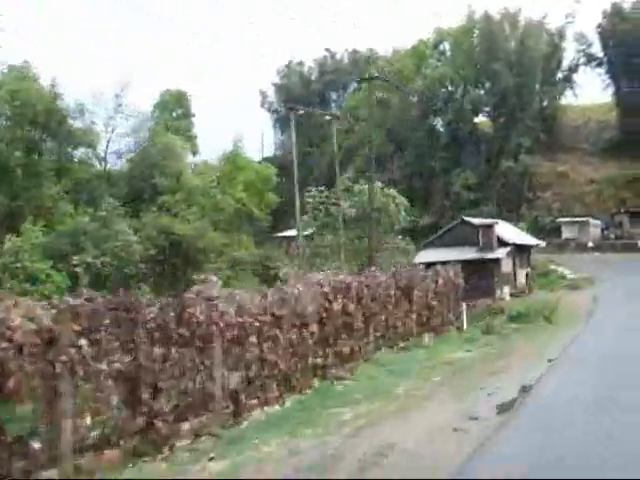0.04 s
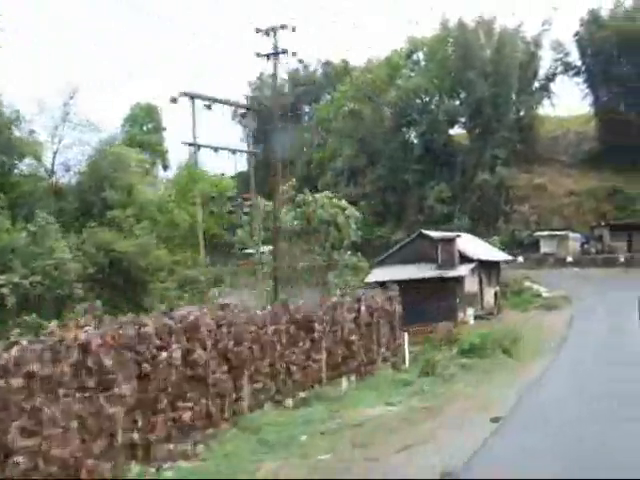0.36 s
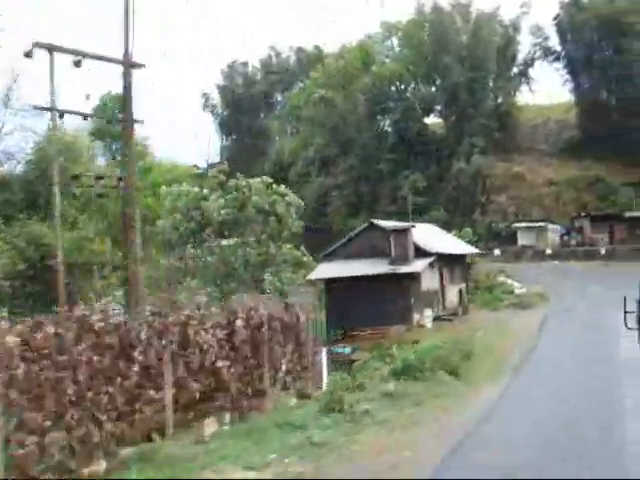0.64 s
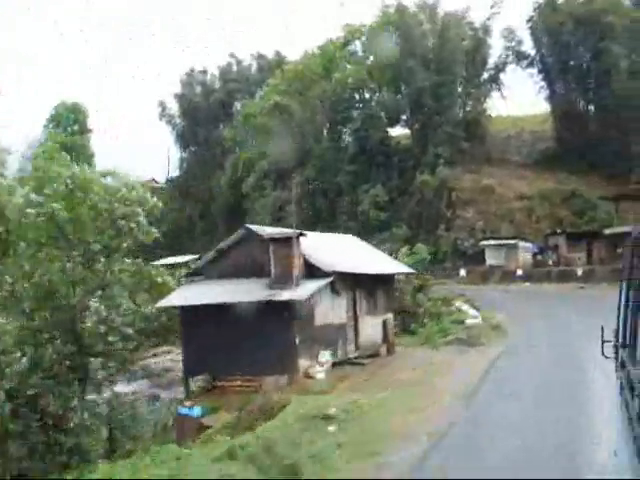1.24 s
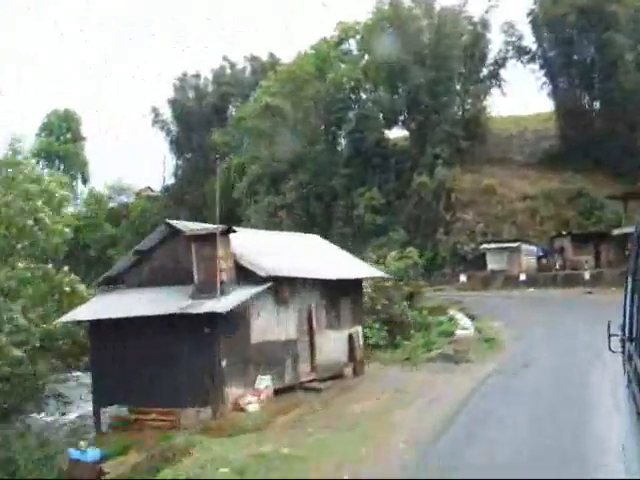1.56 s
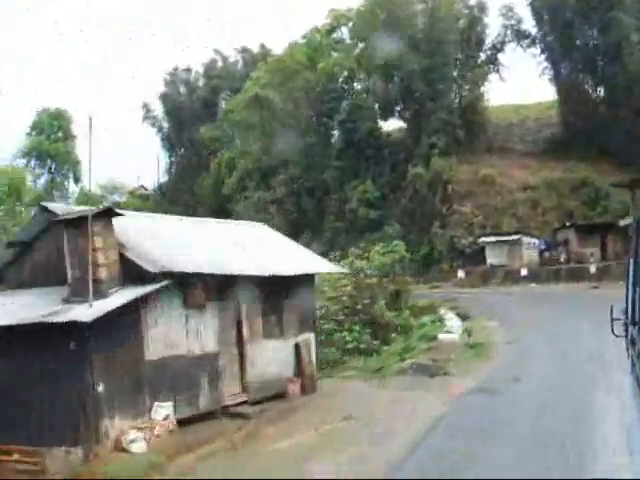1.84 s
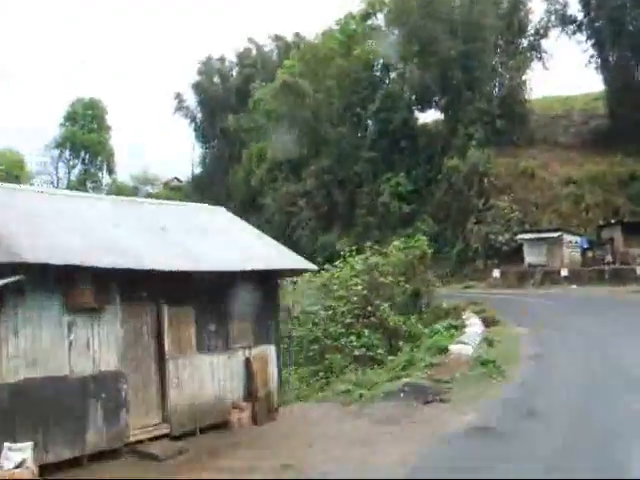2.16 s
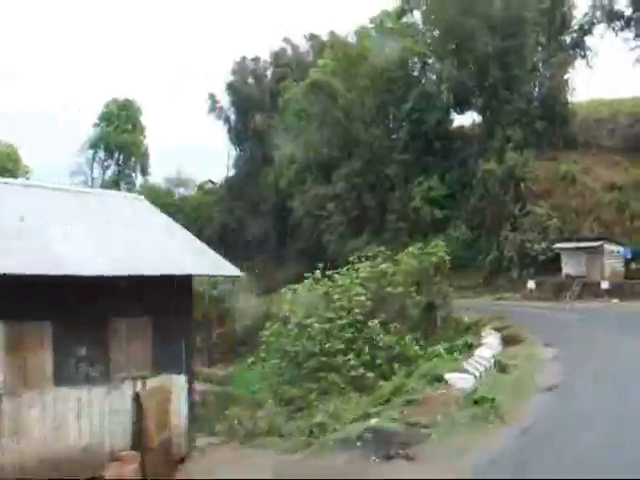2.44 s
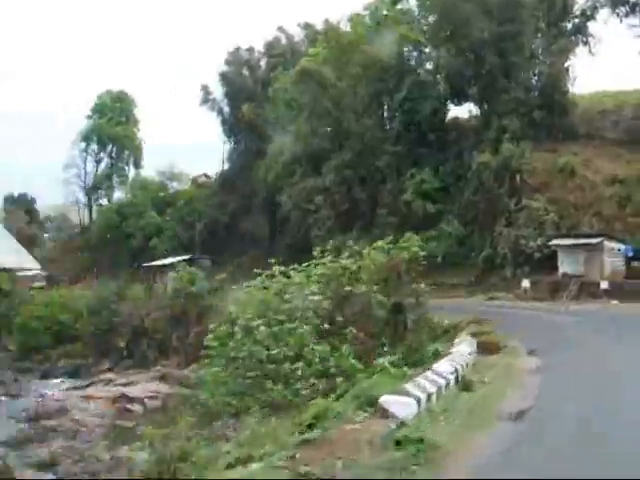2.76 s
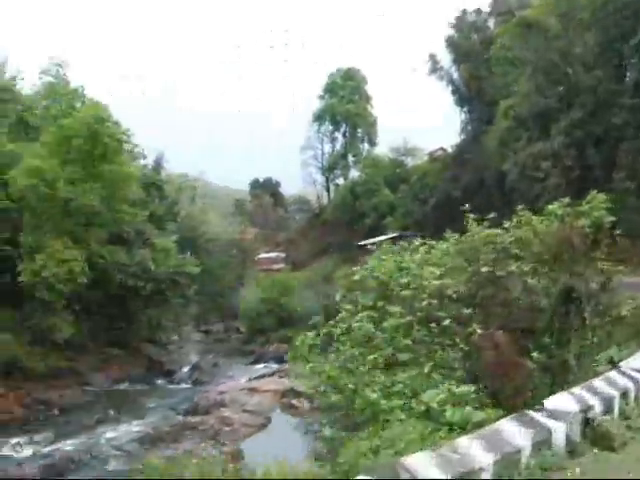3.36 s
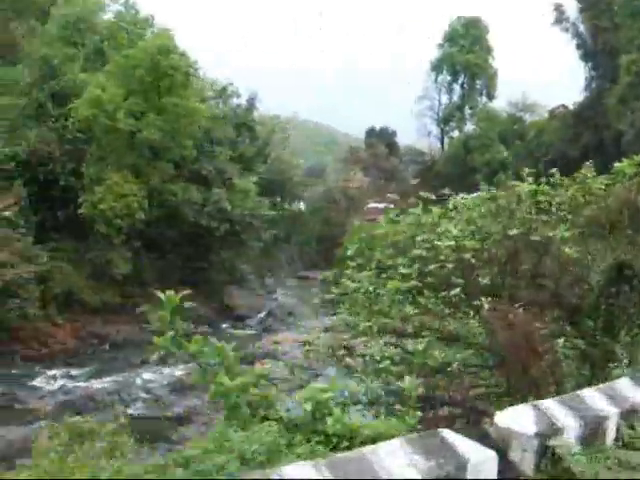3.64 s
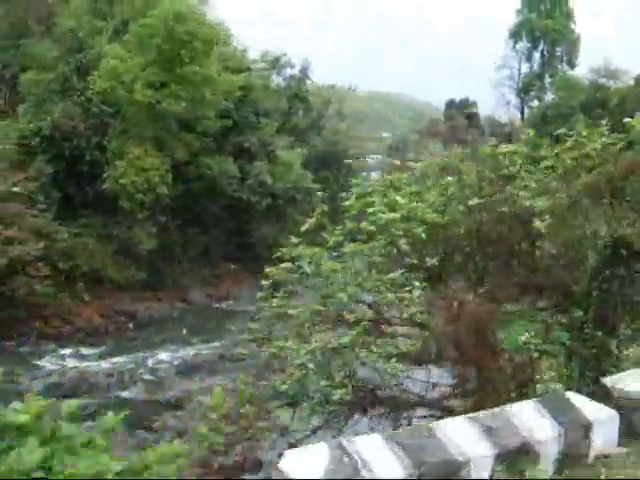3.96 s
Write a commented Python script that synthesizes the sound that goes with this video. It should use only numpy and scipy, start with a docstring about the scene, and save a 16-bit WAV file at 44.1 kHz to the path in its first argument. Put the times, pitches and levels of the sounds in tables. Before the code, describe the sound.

Wind buffets the microphone at the open window of a moving bus, in ragged gusts and low thuds over steady road rumble. The brakes gradually add a thin, high squeal with brief squeaks, then ease off near the end.

```python
"""Downhill bus at an open window

A bus rolls downhill into a bend. Its turbulent slipstream buffets the microphone and tears past
in ragged gusts, over the rumble of road and body and a faint, high hiss. Before the bend, friction
makes the brakes rub, sing thinly and squeak; a loose fitting ticks once."""
import sys
import numpy as np
from scipy import signal
from scipy.io import wavfile

SR = 44100
rng = np.random.default_rng(int(sys.argv[2]) if len(sys.argv) > 2 else 0)


def unload_audio(sound):
    """Save the sound as a 16-bit wav file, at the path given as the first command line argument."""
    columns = np.transpose(np.atleast_2d(sound))
    # keep every value between -1 and 1, then stretch to whole-number steps
    steps = np.round(np.clip(columns, -1, 1) * 32767)
    wavfile.write(sys.argv[1], SR, steps.astype(np.int16))


N = 176400
TIME = np.arange(N) / SR


def from_db(db):
    """Amplitude grows tenfold for every 20 dB."""
    return 10 ** (np.asarray(db) / 20)


def unit_rms(x):
    """Normalisation to a mean power of one."""
    return x / np.sqrt(np.mean(x ** 2) + 1e-20)


def contour(rows):
    """Linear interpolation between (seconds, value) rows."""
    return np.interp(TIME, *np.transpose(rows))


def drift(rate_hz):
    """Low-pass filtered noise wanders smoothly; rms 1."""
    pole = np.exp(-2 * np.pi * rate_hz / SR)
    return unit_rms(signal.lfilter([1], [1, -2 * pole, pole * pole], rng.standard_normal(N + SR))[SR:])


def resonant_band(x, hz, width_hz):
    """Two like resonators in series pass a band about their natural frequency; rms 1."""
    radius = np.exp(-np.pi * width_hz / SR)
    resonator = [1, 0, -1], [1, -2 * radius * np.cos(2 * np.pi * hz / SR), radius * radius]
    return unit_rms(signal.lfilter(*resonator, signal.lfilter(*resonator, x)))


def coloured_noise(spectrum):
    """Weighted half-octave bands of white noise add up to a given spectrum; rms 1."""
    hz, db = np.transpose(spectrum)
    edges = 8 * 2 ** np.arange(0, 11.5, .5)
    centres = np.sqrt(edges[1:] * edges[:-1])
    white = rng.standard_normal((2, N + SR))
    roll_off = np.minimum(1, hz[-1] / centres) ** 2 * np.minimum(1, centres / hz[0]) ** 2
    gains = from_db(np.interp(np.log(centres), np.log(hz), db)) * roll_off
    total = np.zeros(N)
    for k, gain in enumerate(gains):
        band = signal.butter(2, edges[k:k + 2], "band", fs=SR, output="sos")
        total += gain * signal.sosfilt(band, white[k % 2])[SR:]
    return unit_rms(total)


# Slow pressure swings on the microphone. Each row: time in seconds, relative level in dB.
BUFFET_LEVELS = [(0.0, -14.5), (0.24, -10.0), (0.92, -12), (1.04, -15.0), (1.36, -12), (1.8, -15.5),
                 (1.92, -12), (2.12, -15.5), (2.32, -14.5), (2.52, -18), (3.16, -14), (3.36, -12.5),
                 (3.72, -15.5), (3.98, -15.0)]
# Their spectrum. Each row: frequency in Hz, relative spectral density in dB.
BUFFET_SPECTRUM = [(8, -7.5), (14, -1), (30, 0.5), (45, -4), (70, -5), (100, -15), (160, -26.5), (300, -37),
                   (800, -72)]
# Large eddies. Each row: peak time in seconds, swell in dB.
THUD_SWELLS = [(.14, 4.5), (.28, 2), (.37, 4.5), (.49, 3.5), (.70, 7), (.89, 6), (1.15, 4.5), (1.55, 8.5),
               (1.94, 9), (2.15, 10.5), (2.37, 6.5), (2.73, 5), (3.33, 3.5), (3.62, 12.5), (3.79, 11.5)]

def buffet(gain_db=-3, thud_half_width_s=0.018):
    """Turbulent pressure: eddies push on the microphone, and the largest swell into thuds."""
    swell_db = sum(db * np.exp(-((TIME - s) / thud_half_width_s) ** 2) for s, db in THUD_SWELLS)
    return from_db(gain_db + contour(BUFFET_LEVELS) + swell_db) * coloured_noise(BUFFET_SPECTRUM)


# Airflow past the window. Each row: time in seconds, relative level in dB.
GUST_LEVELS = [(0.0, -31), (0.01, -35.5), (0.07, -33.5), (0.11, -38), (0.13, -29.5), (0.18, -44.5),
               (0.24, -32), (0.3, -44), (0.43, -44), (0.68, -33.5), (0.79, -40), (0.8, -51), (0.82, -30),
               (0.89, -37.5), (0.9, -53), (0.93, -38), (1.04, -35), (1.39, -34.5), (1.43, -47.5),
               (1.5, -30), (1.55, -37.5), (1.6, -34.5), (1.64, -38), (1.66, -32.5), (1.7, -42),
               (1.77, -33.5), (1.93, -40.5), (1.94, -27), (1.96, -49), (2.03, -36.5), (2.07, -42.5),
               (2.15, -35), (2.17, -48.5), (2.27, -38), (2.28, -33), (2.34, -37), (2.36, -28.5),
               (2.38, -43.5), (2.49, -33.5), (3.03, -37.5), (3.07, -41.5), (3.1, -31), (3.15, -39.5),
               (3.16, -32), (3.24, -44.5), (3.29, -26.5), (3.34, -43), (3.39, -37.5), (3.4, -47.5),
               (3.44, -36.5), (3.45, -49), (3.48, -41.5), (3.77, -31), (3.78, -41), (3.83, -49),
               (3.9, -39.5), (3.91, -51), (3.94, -36.5), (3.99, -38.5), (4.0, -37)]
# Rushing air, also heard in the slaps. Each row: frequency in Hz, relative spectral density in dB.
AIR_SPECTRUM = [(50, -1.5), (150, 4), (270, -1.5), (400, -7), (700, -16), (1100, -20.5), (2000, -26),
                (4000, -38), (6500, -50.5), (10500, -45), (15000, -43)]

def rush(gain_db=10.5, eddy_db=1.35, sputter_db=2.5):
    """Flow noise: gusts tear past, amplitude-modulated by eddies and a finer sputter."""
    ragged_db = eddy_db * drift(rate_hz=55) + sputter_db * drift(rate_hz=276)
    return from_db(gain_db + contour(GUST_LEVELS) + ragged_db) * coloured_noise(AIR_SPECTRUM)


# Rumble of road and body. Each row: frequency in Hz, relative spectral density in dB.
ROAD_SPECTRUM = [(40, -1), (160, 2.5), (290, -4), (450, -16), (1000, -28.5), (2000, -38.5), (4000, -37),
                 (8000, -37), (10500, -43.5), (15000, -45)]

def road(level_db=-30):
    """Structure-borne sound: tyres and running gear rumble steadily through the body."""
    return from_db(level_db) * coloured_noise(ROAD_SPECTRUM)


def friction_tone(hz, tremble_hz):
    """Random frequency and amplitude modulation roughen a friction-driven mode; rms 1."""
    phase = 2 * np.pi * np.cumsum(hz + tremble_hz * drift(rate_hz=120)) / SR
    roughness_db = 2.8 * drift(rate_hz=64)
    return unit_rms(np.sin(phase) * from_db(roughness_db))


# Brake pressure, given as loudness. Each row: time in seconds, relative level in dB.
BRAKE_LEVELS = [(0, -22), (.55, -22), (.7, -13), (1.45, -10), (2.0, -12), (2.3, -5), (2.45, -4.5), (2.6, 0),
                (2.9, -.5), (3.12, 1.5), (3.27, -17), (4, -22)]
# Tuning of the drum as pressure builds. Each row: time in seconds, frequency ratio.
DRUM_TUNING = [(0, .975), (1.55, .975), (2.2, .997), (2.6, 1.002), (4, .995)]
# The drum's two modes. Each entry: nominal frequency in Hz.
DRUM_HZ = [5562, 10438]
# The same modes. Each row: rms pitch tremble at full pressure in Hz, relative level in dB.
DRUM_MODES = [(36, -52), (40, -59)]
# Rubbing linings. Each row: frequency in Hz, relative spectral density in dB.
RUB_SPECTRUM = [(2500, -29), (5000, -10), (6800, 6), (8500, -1), (10500, -2), (15000, -14)]

def brakes(rub_db=-55, light_touch_spread=4):
    """Friction hisses and sustains the drum's modes, which sing more purely under full pressure."""
    pressure = from_db(contour(BRAKE_LEVELS))
    tuning = contour(DRUM_TUNING)
    spread = light_touch_spread ** (1 - pressure / pressure.max())
    drum = sum(from_db(db) * friction_tone(hz * tuning, tremble_hz * spread)
               for hz, (tremble_hz, db) in zip(DRUM_HZ, DRUM_MODES))
    rub = from_db(rub_db) * coloured_noise(RUB_SPECTRUM)
    return pressure * (drum + rub)


def whine(level_db=-65.5):
    """Narrow-band noise is heard as a faint, pitched hiss high above the rest."""
    return from_db(level_db) * resonant_band(rng.standard_normal(N), hz=12150, width_hz=800)


# Sharp slaps of air. Each row: peak time in seconds, peak level in dB.
AIR_SLAPS = [(.822, -35), (.873, -29.5), (1.14, -30.5), (1.659, -31), (2.361, -37), (3.291, -23),
             (3.737, -26)]

def slaps(rise_s=0.0043, fall_s=0.00082, low_cut_hz=199):
    """Pressure transients: an eddy grows exponentially for milliseconds and breaks off at once."""
    envelope = sum(from_db(db) * np.exp(-np.maximum((s - TIME) / rise_s, (TIME - s) / fall_s))
                   for s, db in AIR_SLAPS)
    low_cut = signal.butter(2, low_cut_hz, "high", fs=SR, output="sos")
    air = signal.sosfilt(low_cut, coloured_noise(AIR_SPECTRUM))
    brightened = signal.lfilter([1, -.96], [1, -.7], air)
    return envelope * unit_rms(brightened)


# Grabs of the linings. Each row: peak time in seconds, length in seconds, relative level in dB.
LINING_GRABS = [(0.963, 0.045, -8), (1.12, .06, -4), (1.517, 0.055, -3), (1.913, .04, -3.5),
                (2.123, 0.068, -8), (2.32, 0.05, -0.5), (2.534, .08, -2.5), (2.71, .05, -2),
                (2.786, 0.029, 2), (2.88, 0.03, 0), (2.973, 0.083, -3.5), (3.22, 0.078, -4.5)]
# The two squeaking modes. Each entry: centre frequency in Hz.
GRAB_HZ = [6980, 9050]
# The same modes. Each row: rms pitch tremble in Hz, relative level in dB.
GRAB_MODES = [(90, -53), (90, -55)]

def squeaks(wander_hz=60):
    """Friction-excited vibration: the linings grab and a second pair of modes swells briefly."""
    envelope = sum(from_db(db) * np.exp(-2 * ((TIME - s) / length) ** 2)
                   for s, length, db in LINING_GRABS)
    tones = sum(from_db(db) * friction_tone(hz + wander_hz * drift(rate_hz=4), tremble_hz)
                for hz, (tremble_hz, db) in zip(GRAB_HZ, GRAB_MODES))
    return envelope * tones


# Modes of the loose fitting. Each row: frequency in Hz, resonator width in Hz, relative level in dB.
FITTING_MODES = [(5300, 1000, -2), (6100, 1000, 0), (10400, 2200, -5)]

def tick(peak_s=1.665, gain_db=-31, decay_s=.0007):
    """Impact excitation: one brief contact sounds the bright resonances of a loose fitting."""
    contact = rng.standard_normal(N)
    ring = sum(from_db(db) * resonant_band(contact, hz, width_hz) for hz, width_hz, db in FITTING_MODES)
    envelope = 1 / np.cosh(np.clip((TIME - peak_s) / decay_s, -20, 20))
    return from_db(gain_db) * envelope * ring


def scene():
    """Superposition: the wind and the sounds of the bus add in one channel."""
    return (buffet() + rush() + road() + brakes() + whine() + slaps() + squeaks() + tick())[None]


def record(dry):
    """Soft saturation in the microphone rounds the largest swings; a low-pass filter cuts the top."""
    ceiling, cutoff_hz = 0.82, 15500
    rounded = ceiling * np.tanh(dry / ceiling)
    return signal.sosfilt(signal.ellip(12, .1, 80, cutoff_hz, fs=SR, output="sos"), rounded)


dry = scene()
out = record(dry)
unload_audio(out)
```